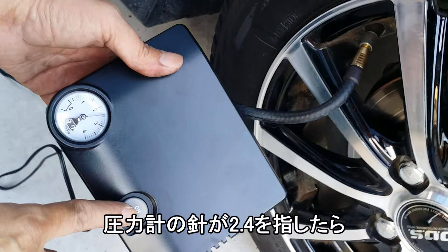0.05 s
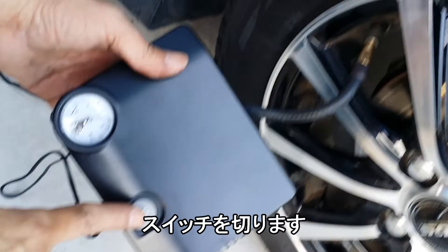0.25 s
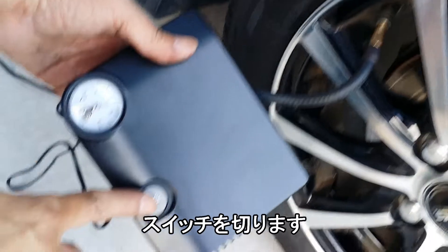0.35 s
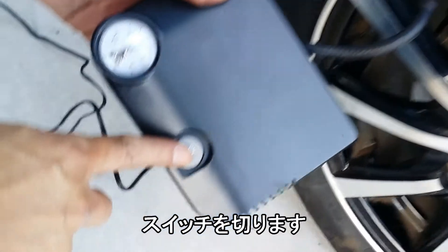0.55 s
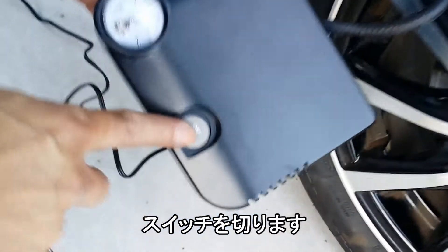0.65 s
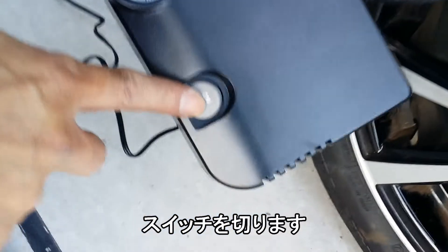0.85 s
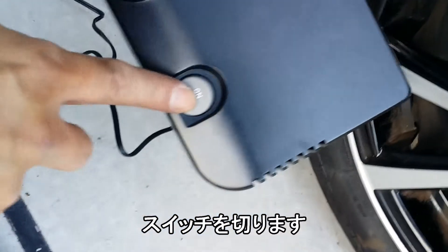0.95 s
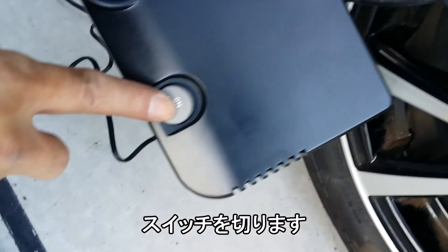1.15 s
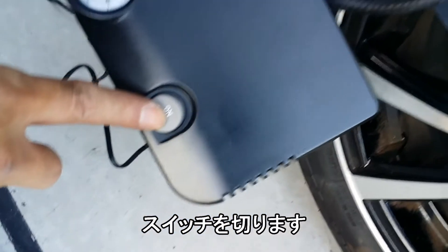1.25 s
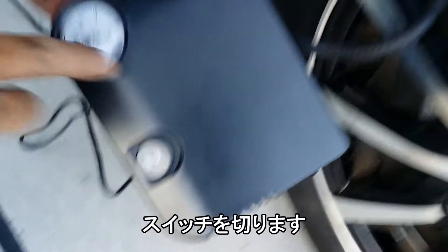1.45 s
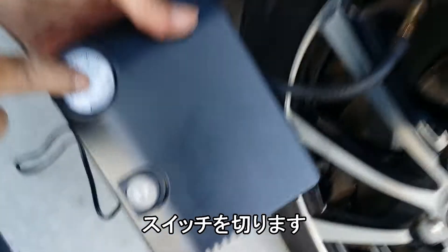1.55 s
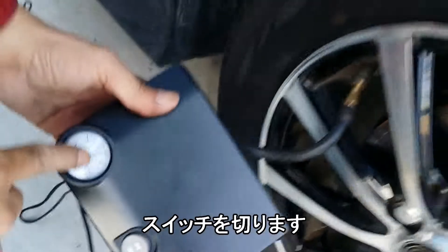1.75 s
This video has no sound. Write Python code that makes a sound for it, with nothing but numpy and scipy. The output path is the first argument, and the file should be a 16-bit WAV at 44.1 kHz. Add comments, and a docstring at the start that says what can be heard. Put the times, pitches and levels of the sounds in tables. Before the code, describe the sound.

A small electric air compressor runs close by outdoors from about 0.15 seconds, with a steady hum, gear whine and rapid rattling knocks in its plastic case. At about 0.7 seconds a switch clicks; the hum sinks and the piston chugs through a few slowing strokes, stopping by about 1 second. After that, only a very faint low outdoor rumble remains, with thin tones and a few soft scuffs.

```python
"""Outdoors, a phone's two microphones close to a small electric piston compressor in a plastic case.
We come in mid-run: each crank turn loads the gears into a burst of whine, knocks the case and puffs air.
At 0.72 s a rocker switch clicks; the hum groans down and the crank coasts through five slowing strokes.
What stays is the low rumble of the open air, a faint stack of thin tones and a few scuffs."""
import sys
import numpy as np
from scipy import signal
from scipy.fft import rfft, irfft
from scipy.io import wavfile
from scipy.ndimage import uniform_filter1d

SR = 44100
rng = np.random.default_rng(int(sys.argv[2]) if len(sys.argv) > 2 else 0)


def generate_wav(signal):
    """Clip the signal to [-1, 1] and save it as 16-bit WAV at the path in sys.argv[1]."""
    frames = np.transpose(np.atleast_2d(signal))
    scaled = np.clip(frames, -1, 1) * 32767
    pcm = np.round(scaled).astype(np.int16)
    wavfile.write(sys.argv[1], SR, pcm)


N = 79380
T = np.arange(N) / SR
HZ = np.arange(N // 2 + 1) * SR / N

START_S, FADE_IN_S = .1535, .00062
CRANK_HZ, STROKE_S = 48.215, .4072  # running speed; a moment of peak compression
POWER_OFF_S, COAST_FROM_S = .708, .7169
SINCE_OFF, COASTED = np.maximum(T - POWER_OFF_S, 0), np.maximum(T - COAST_FROM_S, 0)


def crank(slowing_s=.115):
    """Turns counted from STROKE_S: steady, then coasting to rest."""
    turns = np.cumsum(CRANK_HZ * np.exp(-COASTED / slowing_s)) / SR
    return turns - np.interp(STROKE_S, T, turns)


# Gear bursts close up; last row, the piston's thud
# (pitch [x crank speed], centre [turns], width [turns], level [dB])
GEAR_BURSTS = [(49.42, -.01, 0.1, -12), (53, .19, .05, -18.5), (98.7, -.02, .065, -18.5),
               (67.1, 0.26, 0.094, -23), (41, -.1, .09, -29.5), (59.9, 0.38, 0.088, -27),
               (145, .02, .06, -30.5), (16.2, .28, .03, -7.5)]

def gear_whine(turns, sag_per_turn=.25, rough_db=3, growth_db_per_s=1, dies_s=.03):
    """The piston loads the teeth once a turn: sagging bursts that grow as pressure builds."""
    whine = 0
    for multiple, centre, width, db in GEAR_BURSTS:
        offset = (turns - centre + .5) % 1 - .5
        tone = np.cos(2 * np.pi * multiple * (offset - sag_per_turn * offset ** 2 / 2))
        whine += undb(db + rough_db * wander(150)) * bump(turns, centre, width) * tone
    return whine * undb(growth_db_per_s * (T - STROKE_S)) * np.exp(-SINCE_OFF / dies_s)


# Partials of the case's hum (pitch [x crank speed])
HUM_MULTIPLES = [1, 2, 3, 4, 5, 7, 9, 10, 12, 13.39, 19, 20, 25]
# The same partials, row for row (level [dB], offset [turns], decay time [x dies_s])
HUM_PARTIALS = [(-53.5, .4, .3), (-38.5, 0.43, .3), (-33, .4, 0.33), (-40.5, .4, 0.28), (-39, .4, 0.22),
                (-43.5, .3, .3), (-41.5, .3, .4), (-39, 0.33, .4), (-23, 0.3096, 1.7), (-34, .3, 0.43),
                (-38, .28, 0.47), (-38, 0.25, .41), (-35, 0.42, 0.21)]

def case_hum(turns, sinking_s=.3, dies_s=.06):
    """The shaken case hums; with the power off, the pitch sinks and the hum chugs with the strokes."""
    sinking = sinking_s * (1 - np.exp(-SINCE_OFF / sinking_s))
    hum_turns = CRANK_HZ * (np.minimum(T, POWER_OFF_S) - STROKE_S + sinking)
    hum = 0
    for multiple, (db, offset, lasts) in zip(HUM_MULTIPLES, HUM_PARTIALS):
        level = undb(db + .5 * wander(22)) * np.exp(-(SINCE_OFF / lasts / dies_s) ** 2)
        hum += np.sqrt(2) * level * np.cos(2 * np.pi * multiple * (hum_turns - offset))
    chug_depth = np.clip(SINCE_OFF / .015, 0, 1)
    return hum * (1 - chug_depth * (1 - bump(turns, centre=.2, width=.16)))


# Blows within each turn (place [turns], level [dB])
PISTON_BLOWS = [(.34, -18.5), (.46, -18.5), (.78, -16), (0.11, -19)]
# Resonances of the plastic case (frequency [Hz], width [Hz], level [dB])
CASE_MODES = [(300, 90, -25), (456, 60, -11.5), (613, 35, -4), (736.7, 170, 2), (930, 130, 2.5),
              (1140, 50, -18.5)]

def knocks(turns, jitter_s=.0001, scatter_db=1, soft_hz=1400):
    """Piston and valve blows, a little uneven, ring the case."""
    whole_turns = np.arange(np.floor(turns[0]), turns[-1] - 1)
    blows = np.zeros(N)
    for place, db in PISTON_BLOWS:
        timing, force = rng.standard_normal((len(whole_turns), 2)).T
        times = np.interp(whole_turns + place, turns, T) + jitter_s * timing
        at = np.clip(times * SR, 0, N - 2)
        sample, size = at.astype(int), undb(db + scatter_db * force)
        blows[sample] += size * (1 - at + sample)  # each blow is shared by two samples
        blows[sample + 1] += size * (at - sample)
    return ring(signal.lfilter(*signal.butter(2, soft_hz, fs=SR), blows), CASE_MODES)


# Rattle and air of the works, close up (frequency [Hz], relative level [dB])
RATTLE_SPECTRUM = [(15, -56.5), (25, -32), (43, -27.5), (74, -23.5), (137, -21.5), (195, -26), (516, -6.5),
                   (575, -0.5), (641, -9), (962, -7.5), (1190, -19), (1290, -32), (2110, -13),
                   (2350, -11.5), (3520, -17.5), (4870, -17.5), (11000, -28.5), (14800, -28), (16000, -51)]

def rattle(turns, level_db=-19, dip_db=2.5):
    """Grainy noise of gears and air: even under power, dipping between compressions while coasting."""
    between_strokes = (T >= COAST_FROM_S) * (1 - bump(turns, centre=0, width=.19))
    return hiss(RATTLE_SPECTRUM, grain_db=3) * undb(level_db - dip_db * between_strokes)


# The works coasting to rest (time [s], body [dB], treble [dB], bass [dB])
COAST_LEVELS = [(0.712, -64, -24, -42), (0.722, -87, -16.5, -43), (0.732, -17.5, -29, -52),
                (0.746, -17.5, -21, -23.5), (0.764, -20, -22.5, -35.5), (0.784, -15.5, -24, -36.5),
                (0.794, -26.5, -31.5, -52), (0.806, -20, -26.5, -32), (0.836, -22, -35, -45),
                (0.846, -31.5, -38, -59), (0.876, -21, -36.5, -48), (0.888, -34.5, -49.5, -56),
                (0.904, -29, -47.5, -44), (0.954, -52, -59, -61), (1.01, -39, -64, -65),
                (1.02, -62, -70, -55), (1.13, -62, -83, -72)]

def run_down(works, lean_hz=75, bass_hz=270, treble_hz=1770, air_hz=7500, air_db_per_s=-56.5):
    """Three bands sink unevenly from their running levels as the crank slows; the top fades fastest."""
    times, body_db, treble_db, bass_db = np.array(COAST_LEVELS, float).T

    def gain(db, running_db):
        change = np.r_[0, db - running_db, db[-1] - running_db - 30]
        return undb(np.interp(T, np.r_[POWER_OFF_S - .004, times, times[-1] + .03], change))

    def band(hz, kind):
        return signal.sosfiltfilt(signal.butter(3, hz, kind, fs=SR, output="sos"), works)

    # the small case radiates little below lean_hz
    bass = band([lean_hz, bass_hz], "band") + .4 * band(lean_hz, "low")
    body = band([bass_hz, treble_hz], "band")
    treble = band([treble_hz, air_hz], "band") + band(air_hz, "high") * undb(air_db_per_s * COASTED)
    return bass * gain(bass_db, -36) + body * gain(body_db, -17.5) + treble * gain(treble_db, -21.5)


# The switch's double click (time [s], level [dB])
SWITCH_CLICKS = [(0.7202, -0.5), (.7235, -11.5)]
# Resonances of the rocker (frequency [Hz], width [Hz], level [dB])
ROCKER_MODES = [(1750, 120, -1), (3200, 700, -5), (7700, 5000, 7.5), (13300, 12000, 5.5)]

def switch():
    """The rocker snaps over and rings briefly."""
    blows = np.zeros(N)
    for time, db in SWITCH_CLICKS:
        blows[int(time * SR)] = undb(db)
    return ring(blows, ROCKER_MODES)


# The open air around the phone (frequency [Hz], relative level [dB])
OUTDOOR_SPECTRUM = [(20, -19.5), (45, -13), (80, -0.5), (135, -0.5), (300, -13.5), (550, -25.5),
                    (1000, -27.5), (1500, -39), (2200, -31), (3200, -38), (14500, -50), (16000, -53)]

def outdoor_rumble(level_db=-70, dulling_db_per_s=-6):
    """A low, wavering rumble whose part above 300 Hz slowly fades."""
    air = hiss(OUTDOOR_SPECTRUM, grain_db=0) * undb(level_db + 1.2 * wander(19))
    highs = signal.lfilter(*signal.butter(2, 300, "high", fs=SR), air)
    return air + highs * (undb(dulling_db_per_s * (T - 2)) - 1)


# Background tones (frequency [Hz], level at 1.28 s [dB], slope [dB/s], swell or dip at 1.45 s [dB])
THIN_TONES = [(454, -89, -12, -2.5), (970, -86.5, -24, 1), (1956, -86.5, 5.5, -6), (2441, -83, -30, 2),
              (2929.5, -100, -17, -3)]

def faint_tones(from_s=.99, rise_s=.05):
    """Thin, wavering tones come in as the machine settles; all but one fade."""
    tones = 0
    for hz, db, slope, swell_db in THIN_TONES:
        contour_db = db + slope * (T - 1.28) + swell_db * np.exp(-((T - 1.45) / .2) ** 2)
        tones += np.sqrt(2) * undb(contour_db + 7.2 * wander(21.85)) * np.sin(2 * np.pi * hz * T)
    return tones * np.clip((T - from_s) / rise_s, 0, 1)


# Scuffs in the quiet (time [s], half-length [s], centre [Hz], relative level [dB])
FAINT_SCUFFS = [(1.083, .008, 690, -61), (1.229, .02, 4900, -83), (1.384, 0.013, 1900, -90),
                (1.52, .012, 3500, -94)]

def scuffs():
    """Short, soft swells of band-passed noise."""
    out = 0
    for time, half_length, hz, db in FAINT_SCUFFS:
        noise = signal.lfilter(*signal.iirpeak(hz, 1.5, fs=SR), rng.standard_normal((2, N)))
        out += 4 * undb(db) * np.exp(-((T - time) / half_length) ** 2) * noise
    return out


# Balance at the phone (frequency [Hz], left minus right [dB])
MIC_BALANCE = [(60, 0.5), (110, -5), (200, -1), (380, -3.5), (700, -2.5), (1290, -6.5), (2380, -3.5),
               (4400, -8), (8120, -4.0), (15000, 0.5)]
# Phase at the phone (frequency [Hz], left lead [rad])
MIC_LEAD = [(0, -1.5), (950, 0.53), (1210, 1.37), (2840, 1), (5340, -14), (15400, -42.5)]
# Bounces off ground and wheel (left delay [ms], right delay [ms], left level [dB], right level [dB])
CLOSE_ECHOES = [(1.9, 2.6, -17, -13), (4.3, 3.5, -18, -15)]

def microphones(source):
    """The two microphones differ in level and phase and hear different close echoes."""
    left = undb(on_log(MIC_BALANCE, HZ) / 2) * np.exp(.5j * np.interp(HZ, *np.array(MIC_LEAD).T))
    echoes = 0
    for left_ms, right_ms, left_db, right_db in CLOSE_ECHOES:
        delay_s = np.array([[left_ms], [right_ms]]) / 1000
        echoes += undb([[left_db], [right_db]]) * np.exp(-2j * np.pi * HZ * delay_s)
    echoes *= HZ ** 2 / (HZ ** 2 + 400 ** 2)  # weak below 400 Hz
    eased_in = source * np.clip(T / START_S, 0, 1) ** 2
    return irfft(rfft(eased_in) * (1 + echoes) * np.array([left, 1 / left]), N)


# How alike noise is at the two microphones (frequency [Hz], likeness [0-1])
MIC_LIKENESS = [(60, 0.017), (130, 0.99), (290, 0), (640, 0), (1410, 0.36), (3100, 0.14), (6820, 0.039),
                (15000, 0.39)]

def hiss(spectrum, grain_db):
    """Two channels of grainy coloured noise, most alike near 130 Hz; rms 1."""
    white = rng.standard_normal((2, N))
    grain = rng.standard_normal((2, N // 40 + 1)).repeat(40, axis=1)[:, :N]
    correlation = np.sqrt(np.clip(on_log(MIC_LIKENESS, HZ), 0, 1))
    mid, side = rfft(white * undb(grain_db * grain)) * np.sqrt([1 + correlation, 1 - correlation])
    noise = irfft(np.array([mid + side, mid - side]) * undb(on_log(spectrum, HZ)), N)
    return noise / np.sqrt(np.mean(noise ** 2))


def ring(blows, modes):
    """Two-pole resonances, scaled so that width sets the ring time and not the starting level."""
    return sum(undb(db) * signal.lfilter(*signal.iirpeak(hz, hz / width, fs=SR), blows) * 3000 / width
               for hz, width, db in modes)


def bump(turns, centre, width):
    """A smooth hump once a turn."""
    return np.exp((np.cos(2 * np.pi * (turns - centre)) - 1) / (2 * np.pi * width) ** 2)


def wander(rate_hz):
    """Smooth random drift, spread about a third."""
    step = int(SR / rate_hz)
    return .4 * uniform_filter1d(np.repeat(rng.standard_normal(N // step + 1), step), step)[:N]


def on_log(table, hz):
    """A (frequency, value) table read on a log axis."""
    frequencies, values = np.array(table, float).T
    return np.interp(np.log(hz + 1), np.log(frequencies + 1), values)


def undb(db):
    """Decibels to amplitude."""
    return 10 ** (np.asarray(db) / 20)


def scene(background_right_db=5.5):
    """The compressor close to the phone; the background sits a little to the right."""
    turns = crank()
    works = run_down(microphones(knocks(turns) + rattle(turns)))
    machine = works + microphones(gear_whine(turns) + case_hum(turns) + switch())
    pan = undb(background_right_db * np.array([[-.5], [.5]]))
    background = (faint_tones() + outdoor_rumble() + scuffs()) * pan
    return (machine + background) * np.clip((T - START_S) / FADE_IN_S, 0, 1)


def record(dry):
    """The phone rounds the loudest peaks and cuts the top."""
    ceiling, top_hz = .93, 16300
    rounded = dry / (1 + (dry / ceiling) ** 6) ** (1 / 6)
    return signal.sosfilt(signal.ellip(12, .2, 95, top_hz, fs=SR, output="sos"), rounded)


dry = scene()
out = record(dry)
generate_wav(out)
```